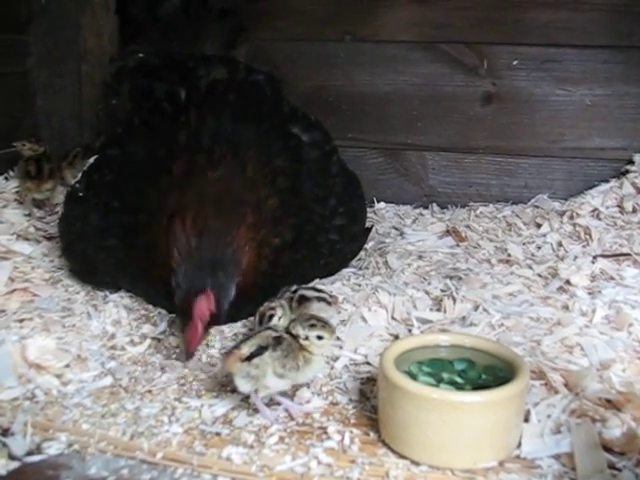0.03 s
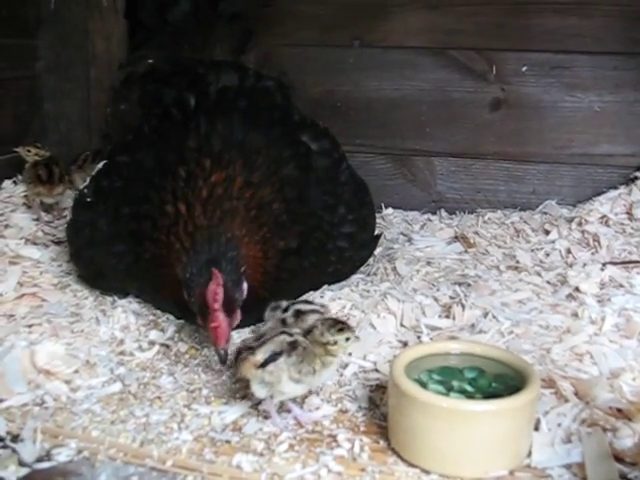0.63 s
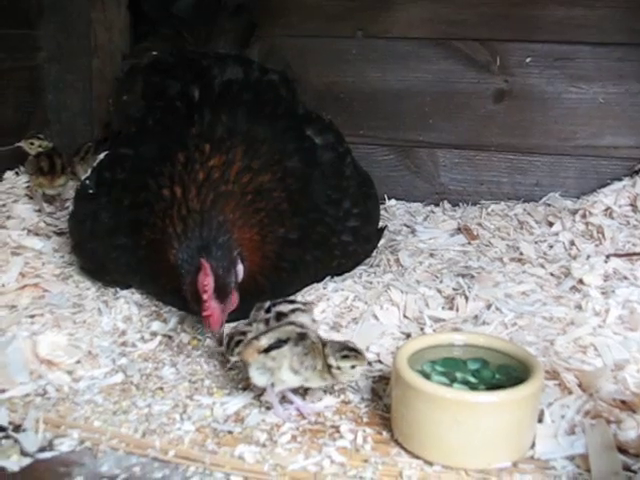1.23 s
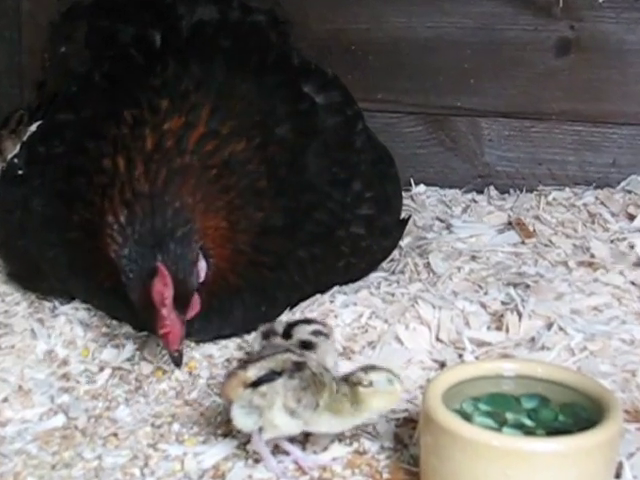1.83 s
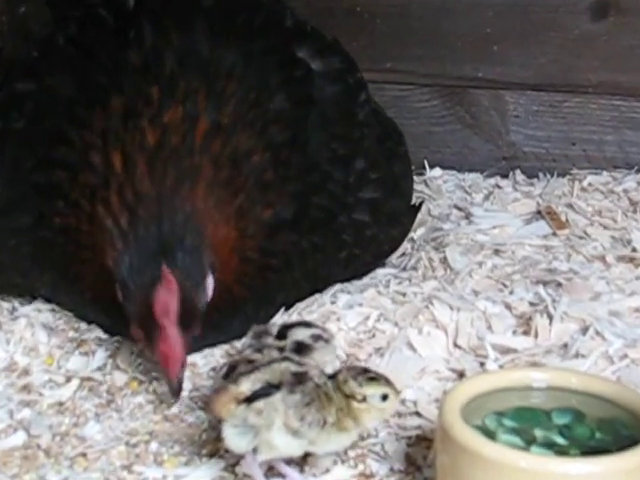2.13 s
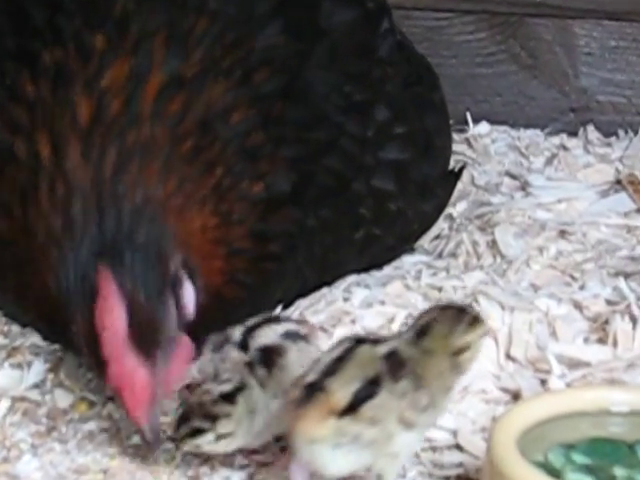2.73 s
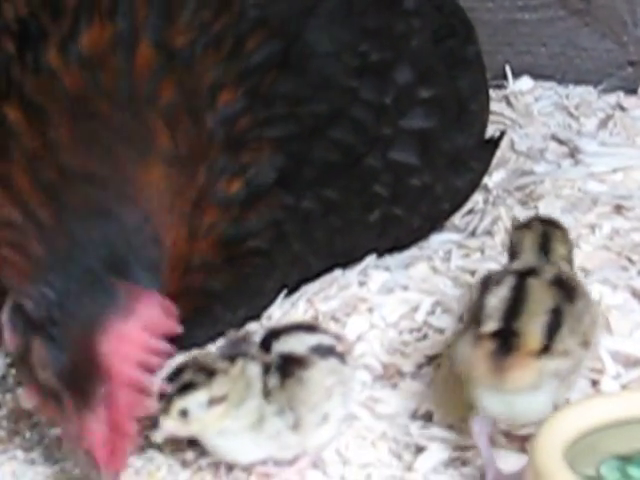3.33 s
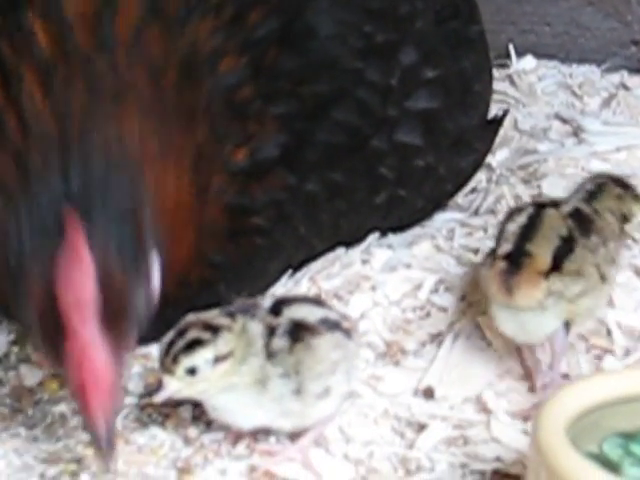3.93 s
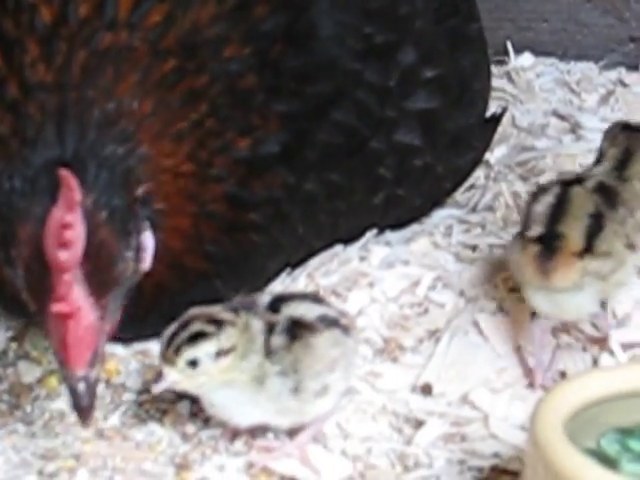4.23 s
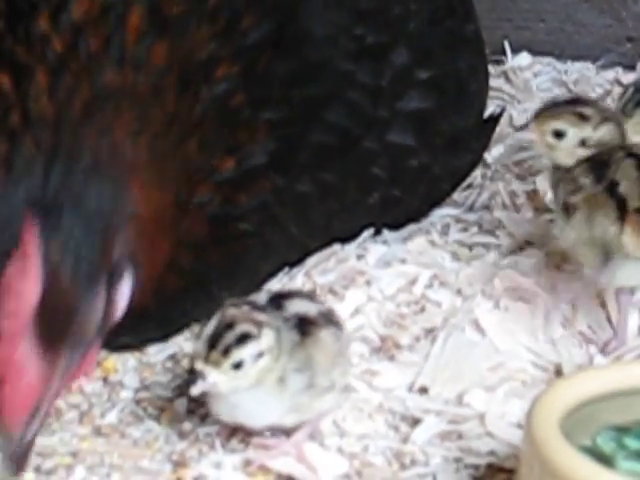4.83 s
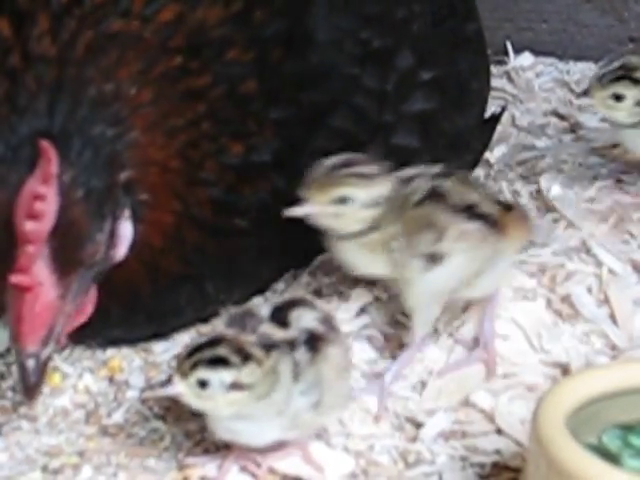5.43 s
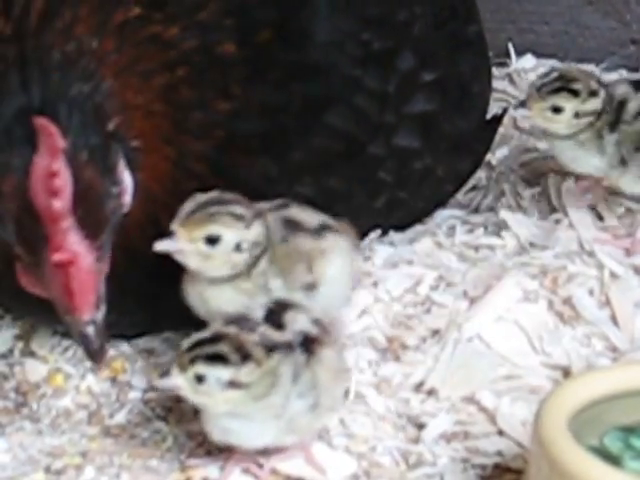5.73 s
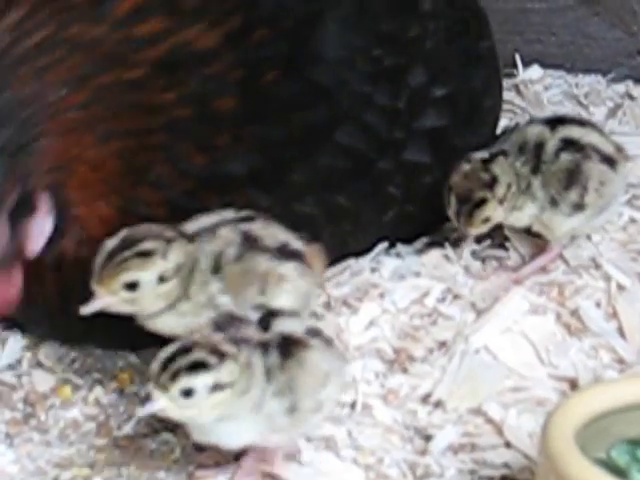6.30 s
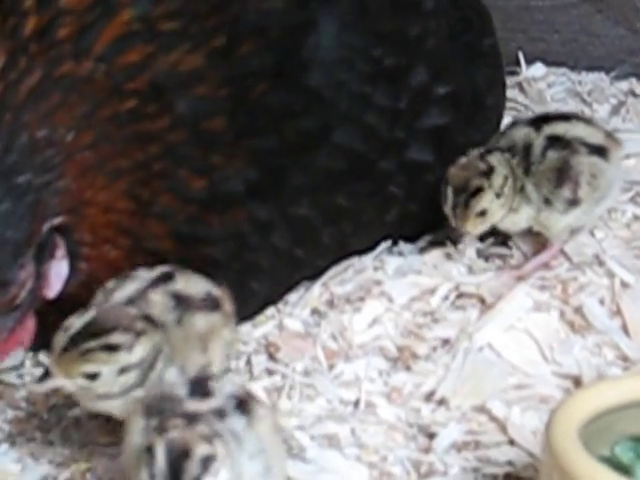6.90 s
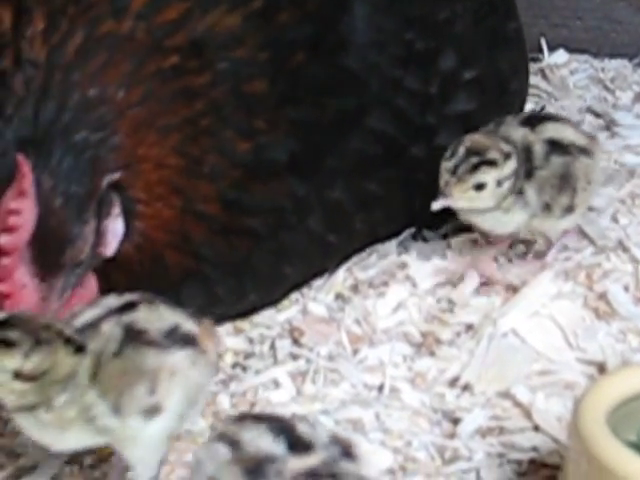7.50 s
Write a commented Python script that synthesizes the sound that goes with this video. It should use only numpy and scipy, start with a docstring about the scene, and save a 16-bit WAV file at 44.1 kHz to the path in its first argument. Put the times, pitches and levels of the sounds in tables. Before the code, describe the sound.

A hen gives short clucks while chicks peep faintly, with pecking and rustling in wood shavings over a low hum and hiss.

```python
"""Feet stir wood shavings and beaks tap the boards of a small wooden coop, over a motor hum and hiss.
Something rubs lightly near the microphone of a hand-held camera, which adds its own whine.
Chicks peep in thin, gliding whistles. Close by, a hen calls them to food with squeaks, murmurs and,
loudest of all, clucks: each is a few throat pulses, falling in pitch, that ring her vocal tract."""
import sys
import numpy as np
from scipy import signal
from scipy.fft import rfft, irfft, next_fast_len
from scipy.io import wavfile
from scipy.ndimage import uniform_filter1d

SR = 44100
rng = np.random.default_rng(int(sys.argv[2]) if len(sys.argv) > 2 else 0)


def generate_wav(signal):
    """Clip the signal to [-1, 1] and save it as 16-bit WAV at the path in sys.argv[1]."""
    frames = np.transpose(np.atleast_2d(signal))
    scaled = np.clip(frames, -1, 1) * 32767
    pcm = np.round(scaled).astype(np.int16)
    wavfile.write(sys.argv[1], SR, pcm)


N = 333396
TIME = np.arange(N) / SR
TOP_HZ = 6900  # upper limit of the hen's harmonics and of the camera's treble


def undb(db):
    """Decibels to amplitude ratio."""
    return 10 ** (np.asarray(db) / 20)


def unit(x):
    """Normalisation to an rms of one."""
    return x / np.sqrt(np.mean(x ** 2) + 1e-18)


def add(out, start, x):
    """Superposition: x joins out at a start time in seconds."""
    i = int(np.clip(start * SR, 0, N - 1))
    out[i:i + len(x)] += x[:N - i]


def band(x, hz, width):
    """Band-pass resonance with unit gain at its centre."""
    return signal.lfilter(*signal.iirpeak(hz, hz / width, fs=SR), x)


def ring(x, hz, width, db=0):
    """Damped oscillator: every pulse of x starts a decaying sine."""
    r, w = np.exp(-np.pi * width / SR), 2 * np.pi * hz / SR
    return undb(db) * signal.lfilter([0, r * np.sin(w)], [1, -2 * r * np.cos(w), r * r], x)


def colour(x, points):
    """Spectral shaping through (Hz, dB) points, normalised to unit rms."""
    hz, db = np.transpose(points)
    size = next_fast_len(len(x))
    bins_hz = np.maximum(np.fft.rfftfreq(size, 1 / SR), 1)
    gain = undb(np.interp(np.log(bins_hz), np.log(hz), db))
    return unit(irfft(rfft(x, size) * gain, size)[:len(x)])


def drift(rate):
    """Random modulation: straight lines join Gaussian values, rate of them a second."""
    knots = rng.standard_normal(2048)
    return np.interp(TIME * rate, np.arange(len(knots)), knots)


def fade(t, t60):
    """Exponential decay, by 60 dB in t60 seconds."""
    return np.exp(-np.log(1000) * t / t60)


def swell(t, length, crest, shape):
    """Envelope that rises to a crest and returns to zero; a small shape flattens the top."""
    rise = np.interp(t, [0, length * np.clip(crest, .05, .95), length], [0, 1, 0])
    return np.sin(np.pi / 2 * rise) ** shape


def grains(rate, spread_db):
    """Shot noise: tiny slips of uneven size, on average rate of them a second."""
    slips = (rng.random(N) < rate / SR) * rng.standard_normal(N)
    return unit(slips * undb(spread_db * rng.standard_normal(N)))


def tone(hz, waver_hz):
    """Frequency modulation: a slightly wandering sine of unit rms."""
    return np.sqrt(2) * np.sin(2 * np.pi * np.cumsum(hz + waver_hz * drift(9)) / SR)


# The motor's weaker harmonics. Each row: multiple of the shaft rate, level in dB.
MOTOR_HARMONICS = [(2, -66.5), (3, -61), (4, -62.5), (6, -60)]
# Dips of its fifth harmonic. Each row: centre in seconds, half-width in seconds, level change in dB.
HUM_DIPS = [(3.85, 0.46, -6), (5.45, 0.21, -28), (6.95, .3, -16)]

def motor(shaft_hz=23, waver_hz=.15, fifth_db=-49, flutter_db=3.0):
    """Harmonic series of a distant rotating shaft; the strong fifth flutters and dips now and then."""
    angle = 2 * np.pi * np.cumsum(shaft_hz + waver_hz * drift(9)) / SR
    dips_db = sum(db * np.exp(-((TIME - centre) / half) ** 2) for centre, half, db in HUM_DIPS)
    fifth = undb(fifth_db + dips_db + flutter_db * drift(15)) * np.sin(5 * angle)
    others = sum(undb(db) * np.sin(k * angle) for k, db in MOTOR_HARMONICS)
    return np.sqrt(2) * (fifth + others)


# The two whining tones. Each entry: frequency in Hz.
WHINE_HZ = (4702.6, 6322)
# Their envelopes. Each row: level in dB, decay time constant in scans.
WHINE_ENVELOPES = [(-51.5, 0.45), (-55.5, .36)]

def camera_whine(scan_hz=59.94):
    """Amplitude modulation: two tones, restruck at each picture scan, take on a buzz."""
    scan_phase = TIME * scan_hz % 1
    return sum(undb(db) * unit(np.exp(-scan_phase / decay) * tone(hz, waver_hz=.4))
               for hz, (db, decay) in zip(WHINE_HZ, WHINE_ENVELOPES))


# Spectra of the room air and the camera's hiss. Each row: frequency in Hz, relative level in dB.
AIR_SPECTRUM = [(20, -17.5), (35, -21), (55, -14.5), (90, -14), (130, -9), (220, -14), (400, -13),
                (700, -16.5), (1600, -17), (2000, -18), (4400, -19), (5700, -48)]
HISS_SPECTRUM = [(3500, -30), (4300, -8.5), (4800, 4), (5300, 1), (6000, 0.5), (6500, -4.5), (7000, -23.5)]
# Faint steady tones. Each row: frequency in Hz, level in dB, waver in Hz.
STEADY_TONES = [(60.6, -56.5, .2), (1620, -60.5, 4), (2547, -66, 4), (3404, -58.5, 1.5)]

def background(air_db=-43.5, swell_db=1.63, hiss_db=-50.5):
    """Noise floor: continuous spectra of air and hiss lie under the line spectra of hum and whine."""
    air = undb(air_db + swell_db * drift(3.8)) * colour(rng.standard_normal(N), AIR_SPECTRUM)
    hiss = undb(hiss_db) * colour(rng.standard_normal(N), HISS_SPECTRUM)
    tones = sum(undb(db) * tone(hz, waver_hz) for hz, db, waver_hz in STEADY_TONES)
    return air + hiss + tones + camera_whine() + motor()


# Rubbing strokes. Each row: start in seconds, length in seconds, relative level at the crest in dB,
# crest time as a fraction of the length.
RUB_STROKES = [(0.449, 0.2, -32.5, 0.28), (0.63, 0.28, -34, .52), (0.916, 0.12, -38, .35),
               (1.076, 0.12, -37, 0.93), (1.193, 0.054, -30, 0.28), (2.956, .1, -37, 0.72),
               (3.027, 0.068, -25.5, 0.59), (3.388, 0.096, -36, 0.71), (3.465, 0.13, -25.5, 0.44),
               (6.604, 0.057, -36.5, .3), (6.644, .105, -30, 0.46), (6.732, 0.064, -32, 0.58),
               (6.906, 0.073, -36, .2), (7.39, 0.11, -39.5, .5), (7.483, 0.049, -35, .35),
               (7.522, .07, -30.5, 0.49)]
# Spectrum of the rubbing. Each row: frequency in Hz, relative level in dB.
RUB_SPECTRUM = [(400, -16), (900, -12), (1200, -6.5), (1430, 1.5), (1700, -8.5), (2000, -14), (2300, -3.5),
                (2600, -0.5), (2950, -6.5), (3300, -12), (4000, -17.5), (5000, -21), (7000, -32)]

def rubbing(gain_db=-1, catch_db=2.5, shape=1.09):
    """Stick-slip friction, probably fingers on the camera: uneven slips excite two broad resonances."""
    pressure = sum(undb(db) * swell(TIME - start, length, crest, shape)
                   for start, length, db, crest in RUB_STROKES)
    slips = grains(rate=12000, spread_db=0.4) * undb(catch_db * drift(110))
    return undb(gain_db) * pressure * colour(slips, RUB_SPECTRUM)


# Shuffles. Each row: start in seconds, t60 in seconds, rustle level in dB, thud in dB above the rustle.
SHUFFLES = [(0, 0.14, -29, -2), (1.607, 0.3, -28.5, -1), (2.093, 0.28, -41, 10), (2.704, 0.13, -37, -3),
            (3.058, .12, -31, 2.5), (3.176, 0.15, -42, 4), (3.345, 0.13, -28.5, -10),
            (3.886, 0.2, -36.5, 2.5), (4.608, 0.62, -31.5, -11), (4.80, 0.65, -35, -15),
            (4.855, 0.29, -37, -21), (5.686, 0.34, -40, -9), (5.843, 0.17, -43.5, -22),
            (6, 0.33, -37.5, -11), (6.507, 1, -36.5, -9), (6.65, 0.34, -34, -25), (6.911, 0.81, -33.5, -9),
            (7.485, 0.46, -42, -19.5)]
# Spectrum of the shavings. Each row: frequency in Hz, relative level in dB.
SHAVINGS_SPECTRUM = [(100, -10.5), (250, -6), (450, -1), (900, -3.5), (1250, -11.5), (1600, -11),
                     (2100, -18), (3000, -14.5), (5000, -22.5), (7000, -35)]

def shuffles(rise_s=0.0097, thud_hz=135, thud_width_hz=140):
    """Granular friction: feet and feathers push through shavings while the hen's weight thuds softly."""
    rustle = colour(grains(rate=3500, spread_db=0.5), SHAVINGS_SPECTRUM)
    rumble = band(rng.standard_normal(N), thud_hz, thud_width_hz)
    thud = unit(band(rumble, thud_hz, thud_width_hz))
    out = np.zeros(N)
    for start, t60, db, thud_db in SHUFFLES:
        t = TIME - start
        push = np.clip(t / rise_s, 0, 1) * fade(np.maximum(t - rise_s, 0), t60)
        out += undb(db) * push * (rustle + undb(thud_db) * thud)
    return out


# Pecks and steps. Each row: start in seconds, peak level in dB, frequency of the struck spot in Hz,
# t60 of the crushing in seconds, click peak in dB above the knock's.
PECKS = [(.099, -24, 866, 0.024, -4), (0.214, -23, 1430, 0.022, 0), (0.907, -12.5, 1430, 0.022, -5.5),
         (0.965, -26, 312, 0.032, -15), (1.049, -22.5, 1350, 0.037, -5.5), (1.2, -27, 1430, 0.035, 6),
         (1.457, -24.5, 340, 0.051, -1), (1.604, -21.5, 2700, 0.024, 3), (2.712, -25, 352, 0.037, -21),
         (3.349, -27, 794, 0.041, -8), (3.429, -22, 2400, 0.01, -8), (3.595, -21.5, 338, 0.018, -20),
         (3.677, -24, 250, 0.052, -3), (3.959, -22.5, 550, 0.038, -9), (4.531, -23.5, 720, 0.055, 4.5),
         (5.029, -23.5, 810, 0.037, -2), (5.412, -19.5, 805, 0.025, -19.5), (6.499, -24.5, 217, 0.055, 0.5),
         (6.66, -15.5, 790, 0.032, -15), (6.8418, -14.5, 765, 0.008, -15.5),
         (6.989, -26.5, 1150, 0.023, -10)]
# Modes of the floor boards. Each row: frequency in Hz, longest t60 in seconds, relative level in dB.
BOARD_MODES = [(360, 0.061, -13.5), (760, 0.042, -9.5), (950, 0.0091, -6), (1750, 0.045, -11.5),
               (2520, 0.02, -16.5), (3800, 0.016, -22.5)]

def pecks(crush_db=-13, click_t60=0.017, soft_t60=0.064, spot_t60=.025):
    """Impact excitation: a tap crushes a few chips and rings the struck spot and the boards below."""
    out, t = np.zeros(N), np.arange(SR // 7) / SR
    for start, db, spot_hz, t60, click_db in PECKS:
        chips, crack = rng.standard_normal((2, len(t)))
        force = undb(crush_db) * chips * fade(t, t60) * t60 / soft_t60  # softer taps crush more
        force[0] += 1  # the impact itself
        spot = np.sin(2 * np.pi * spot_hz * t) * fade(t, min(t60, spot_t60))
        boards = sum(undb(mode_db) * np.sin(2 * np.pi * hz * t) * fade(t, min(mode_t60, t60))
                     for hz, mode_t60, mode_db in BOARD_MODES)
        knock = signal.fftconvolve(force, spot + boards)[:len(t)]
        click = band(band(crack, hz=2400, width=2200), hz=2200, width=2200) * fade(t, click_t60)
        tap = knock / np.abs(knock).max() + undb(click_db) * click / np.abs(click).max()
        add(out, start, undb(db) * tap / np.abs(tap).max())
    return out


# Peeps. Each row: start and length in seconds, first, middle and last pitch in Hz, nominal peak in dB.
PEEPS = [(1.055, 0.064, 4200, 3990, 3700, -37), (1.301, 0.061, 3900, 3860, 3700, -40),
         (2.086, 0.036, 4450, 4090, 4000, -39), (2.63, 0.097, 3980, 3930, 3870, -45),
         (2.95, 0.13, 3790, 3860, 4240, -42.5), (3.266, 0.105, 3930, 3820, 3880, -42),
         (4.322, 0.031, 4230, 4070, 4030, -44.5), (4.439, 0.072, 4760, 4170, 4000, -39.5),
         (5.933, 0.02, 4400, 4310, 4220, -43), (6.803, 0.048, 5080, 4930, 4940, -46),
         (7.4, 0.048, 5570, 5400, 5000, -45)]

def chicks(waver_hz=30, shimmer_db=4.0):
    """Jitter and shimmer roughen a thin whistle that glides through three pitches."""
    out = np.zeros(N)
    for start, length, first_hz, middle_hz, last_hz, db in PEEPS:
        progress = np.linspace(0, 1, int(length * SR))
        glide = np.polyfit([0, .5, 1], [first_hz, middle_hz, last_hz], 2)
        hz = np.polyval(glide, progress) + waver_hz * drift(240)[:len(progress)]
        envelope = undb(db + shimmer_db * drift(220)[:len(progress)]) * np.sin(np.pi * progress)
        add(out, start, envelope * np.sin(2 * np.pi * np.cumsum(hz) / SR))
    return out


# The hen's fixed resonances. Each mode: frequency in Hz, bandwidth in Hz, relative gain in dB.
CHEST_MODE = (224, 48, 0)
WINDPIPE_MODE = (559, 95, -9)
MOUTH_MODE = (1220, 200, -10)
BEAK_MODES = [(2510, 500, 3.6), (3060, 330, -2)]

def throat(hz, effort, opening, formant1_hz, formant2_hz, chest_db, beak_db, rasp_db, width_hz=170):
    """Source and filter: syrinx pulses ring the vocal tract; the open beak lets out the upper modes."""
    cycles = np.cumsum(hz) / SR - .03  # the first pulse comes just after the onset
    k = np.arange(1, 33)[:, None]
    harmonics = np.cos(2 * np.pi * k * cycles) * np.clip((TOP_HZ - k * hz) / hz, 0, 1)
    pulses = np.sum(harmonics, axis=0) * hz / SR
    turbulence = np.exp(-(cycles % 1) * 2) * rng.standard_normal(len(hz))  # one puff per pulse
    source = effort * (pulses + undb(rasp_db) * turbulence)
    chest = undb(chest_db) * ring(source, *CHEST_MODE)
    low = ring(source, formant1_hz, width_hz) + ring(source, *WINDPIPE_MODE) + chest
    escaping = opening * source
    beak = undb(beak_db) * sum(ring(escaping, *mode) for mode in BEAK_MODES)
    high = ring(escaping, formant2_hz, width_hz) + ring(escaping, *MOUTH_MODE) + beak
    return low - high


def held_voice(hz, formant1_hz):
    """Sustained phonation with the beak nearly closed, levelled to unit rms."""
    voice = throat(hz, effort=1, opening=undb(-9), formant1_hz=formant1_hz, formant2_hz=1130,
                   chest_db=-20, beak_db=-12, rasp_db=-40)
    return voice / np.sqrt(uniform_filter1d(voice ** 2, size=300) + 1e-12)


# Murmurs. Each row: start and length in seconds, starting pitch in Hz, level in dB, first formant in Hz.
MURMURS = [(3.885, .07, 493, -42.5, 494), (4.165, 0.074, 458, -38.5, 447)]

def murmurs(sag_hz_per_s=730, crest=0.58, shape=1.4):
    """Formant tuning: a resonance near the fundamental gives a quiet, smooth note that slowly sinks."""
    out, t = np.zeros(N), np.arange(SR // 12) / SR
    for start, length, hz, db, formant1_hz in MURMURS:
        voice = held_voice(hz - sag_hz_per_s * t, formant1_hz)
        add(out, start, undb(db) * swell(t, length, crest, shape) * voice)
    return out


# Squeaks. Each row: start, length and attack in seconds, low pitch in Hz, level in dB, first formant
# in Hz, delay and duration of the break in seconds, high pitch in Hz, its sag in Hz per second.
SQUEAKS = [(1.803, .041, 0.018, 338, -21, 770, 0.018, .03, 607.5, 3250),
           (6.299, 0.047, .004, 408.5, -24, 850, .0145, .023, 1193, 16660)]

def squeaks(droop=0.236, release_s=0.0098, jump_s=0.0026):
    """Register break: the low pitch follows the effort, then the membrane briefly jumps high and sags."""
    out, t = np.zeros(N), np.arange(SR // 12) / SR
    for start, length, attack, low_hz, db, formant1_hz, delay, duration, high_hz, sag in SQUEAKS:
        effort = np.clip(np.minimum(t / attack, (length - t) / release_s), 0, 1)
        low = low_hz * (1 - droop * (1 - effort))
        high = high_hz - sag * np.clip(t - delay, 0, duration)
        register = np.clip(np.minimum(t - delay, delay + duration - t) / jump_s + .5, 0, 1)
        voice = held_voice(low + register * (high - low), formant1_hz)
        add(out, start, undb(db) * effort * voice)
    return out


# Clucks. Each row: start and length in seconds, tight and slack pitch in Hz, peak level in dB,
# crest time as a fraction of the length, first and second formant in Hz, then the relative gains
# in dB of the initial beak opening, the chest mode, the beak modes and the rasp.
CLUCKS = [(2.087, 0.033, 509, 344.2, -14.5, 0.15, 600, 1840, -11, -26, 5.5, -27),
          (3.72, 0.026, 330, 177.9, -5.5, 0.37, 765, 1390, -6, -11.5, -4.5, -53),
          (4.0, 0.023, 628, 259, -6, 0.084, 715, 1696, -3, -11, -7.5, -47.5),
          (4.2443, .016, 417, 175.7, -7, .29, 720, 1504, 0.5, -12.5, -10, -47.5),
          (5.1248, 0.025, 764, 212.6, -9, 0.36, 796, 1595, 0, -8, -3.5, -34),
          (5.4495, 0.015, 670, 245.5, -7.5, 0.18, 690, 1644, 0, -6.5, -6, -44),
          (6.9107, 0.027, 660, 179.4, -13.5, 0.033, 587, 1280, 4.5, 1.5, -7.5, -40),
          (7.4692, 0.025, 545, 191.4, -10, .18, 780, 1600, -4, -11.5, -22, -39.5)]

def clucks(slacken_s=.0032, close_s=.01, onset_effort=.2):
    """Tension sets pitch: in one short push of air the membrane slackens while the beak closes."""
    out, t = np.zeros(N), np.arange(SR // 12) / SR
    for (start, length, tight_hz, slack_hz, db, crest, formant1_hz, formant2_hz,
         open_db, chest_db, beak_db, rasp_db) in CLUCKS:
        hz = slack_hz + (tight_hz - slack_hz) * np.exp(-t / slacken_s)
        effort = np.interp(t / length, [0, crest, 1], [onset_effort, 1, 0])
        opening = undb(open_db) * np.exp(-t / close_s)
        voice = throat(hz, effort, opening, formant1_hz, formant2_hz, chest_db, beak_db, rasp_db)
        add(out, start, undb(db) * voice / np.abs(voice).max())
    return out


def coop(direct, wet_db=-17.5, t60=0.098, delay_s=0.01):
    """Reverberation: close wooden walls add a short, dull tail."""
    t = np.arange(SR // 4) / SR
    tail = band(rng.standard_normal(len(t)), hz=460, width=2400) * fade(t, t60) * (t > delay_s)
    tail /= np.sqrt(np.sum(tail ** 2))
    return direct + undb(wet_db) * signal.fftconvolve(direct, tail)[:N]


def scene():
    """Superposition in one channel: calls and taps ring in the coop; the other layers stay dry."""
    birds = coop(clucks() + murmurs() + squeaks() + chicks() + pecks())
    return (birds + shuffles() + rubbing() + background())[None]


def record(dry, edge_hz=5300):
    """Low-pass filtering: the camera's treble rolls off from about 5 kHz and ends near 7 kHz."""
    soft = signal.sosfilt(signal.butter(8, edge_hz, fs=SR, output="sos"), dry)
    return signal.sosfilt(signal.ellip(10, .2, 80, TOP_HZ, fs=SR, output="sos"), soft)


dry = scene()
out = record(dry)
generate_wav(out)
```